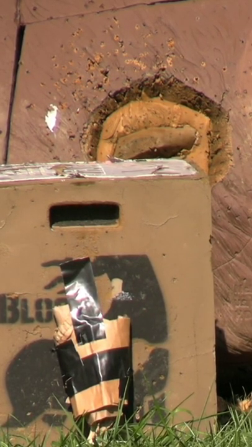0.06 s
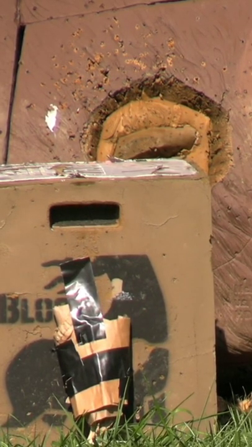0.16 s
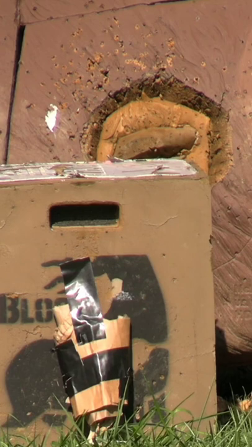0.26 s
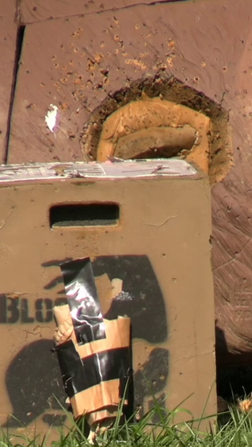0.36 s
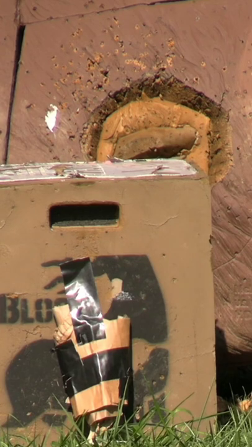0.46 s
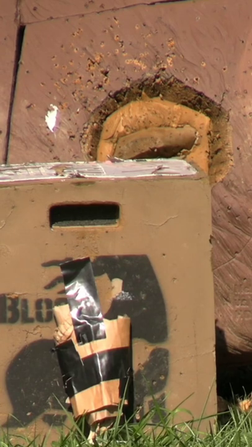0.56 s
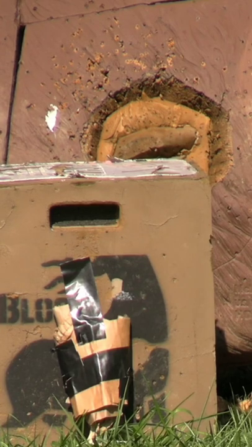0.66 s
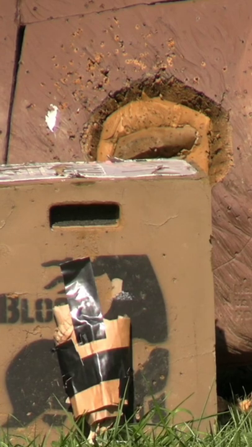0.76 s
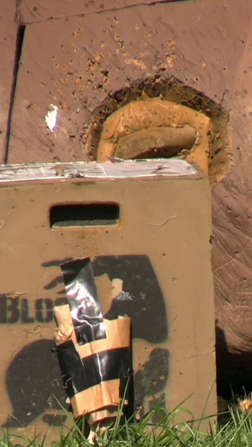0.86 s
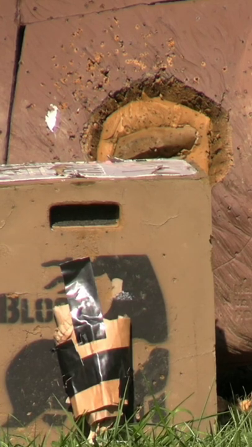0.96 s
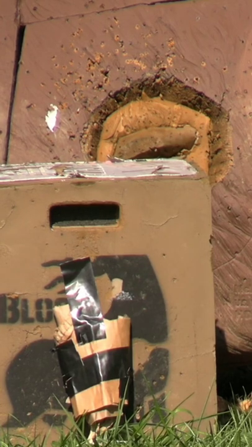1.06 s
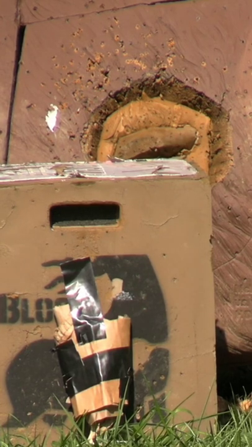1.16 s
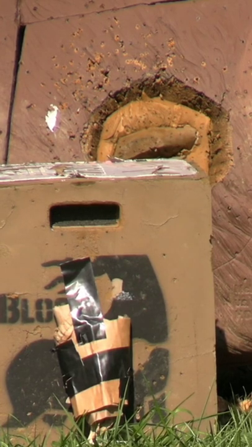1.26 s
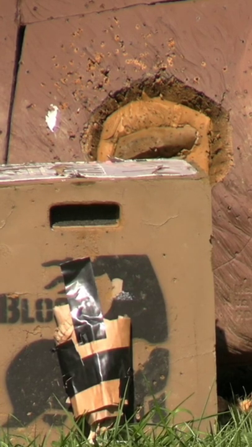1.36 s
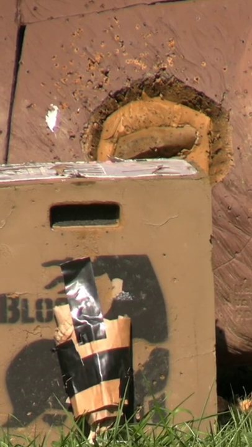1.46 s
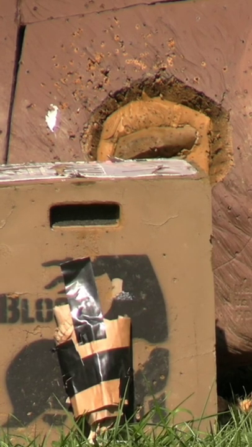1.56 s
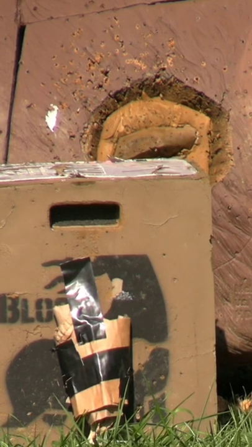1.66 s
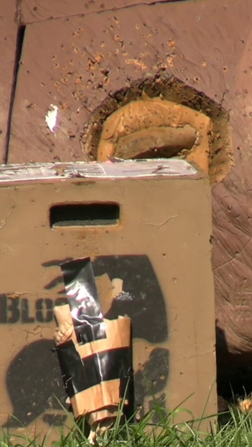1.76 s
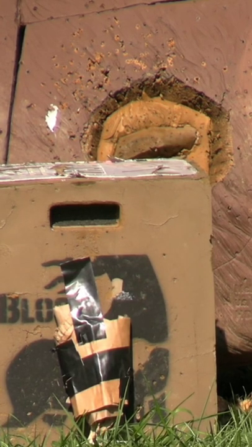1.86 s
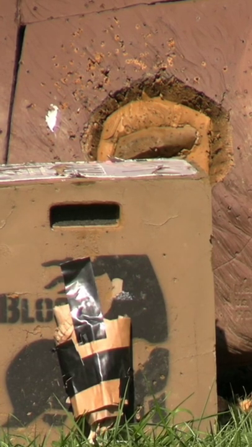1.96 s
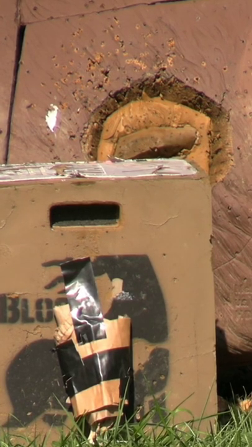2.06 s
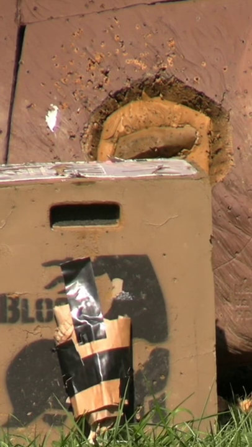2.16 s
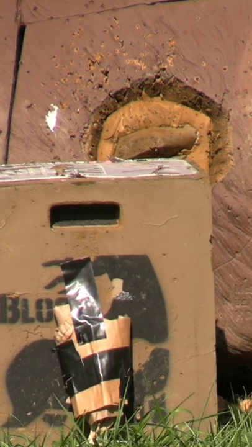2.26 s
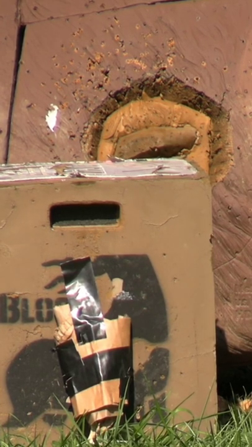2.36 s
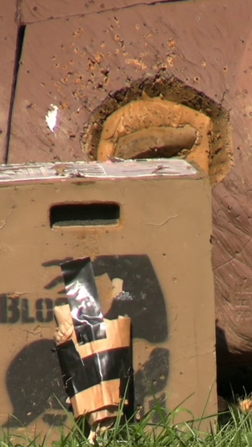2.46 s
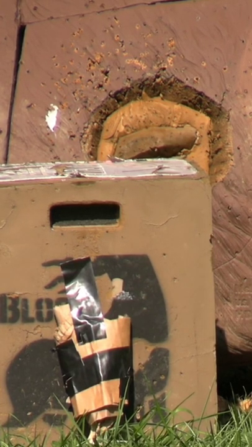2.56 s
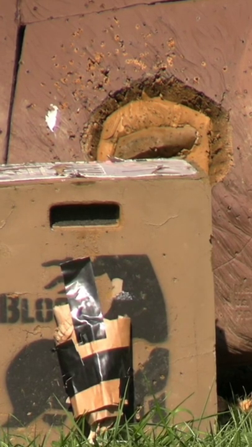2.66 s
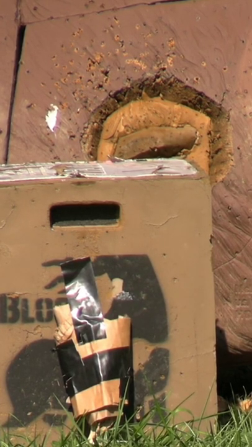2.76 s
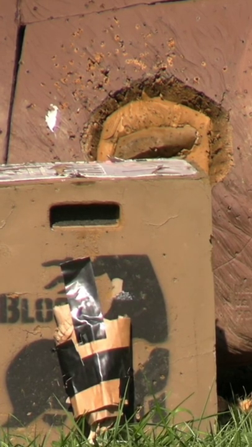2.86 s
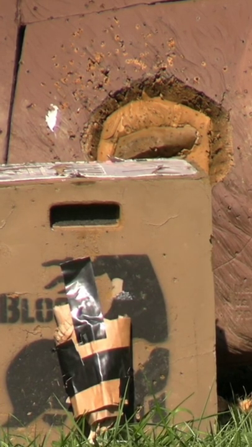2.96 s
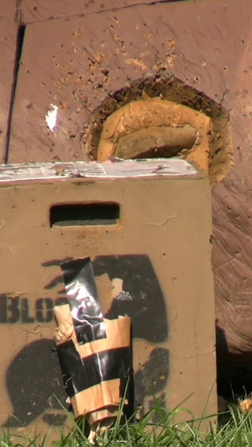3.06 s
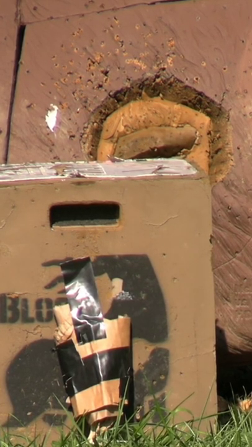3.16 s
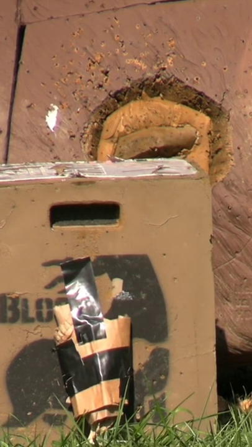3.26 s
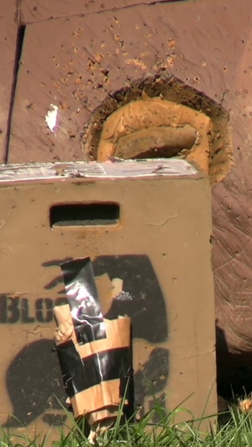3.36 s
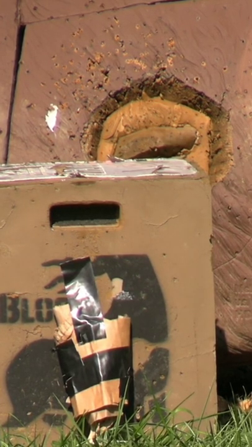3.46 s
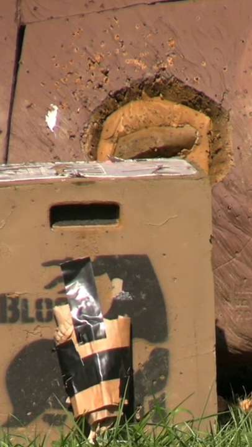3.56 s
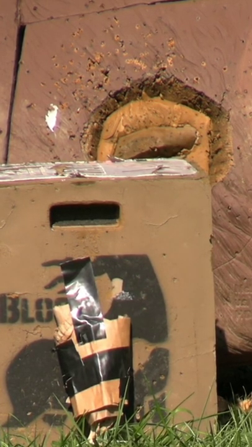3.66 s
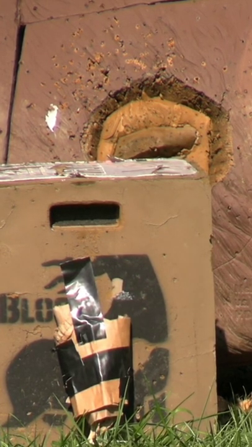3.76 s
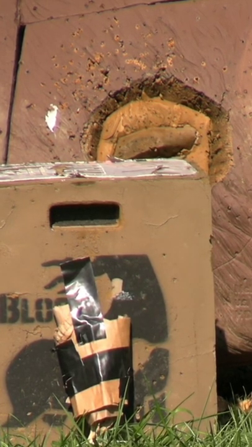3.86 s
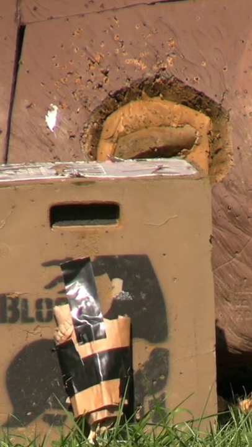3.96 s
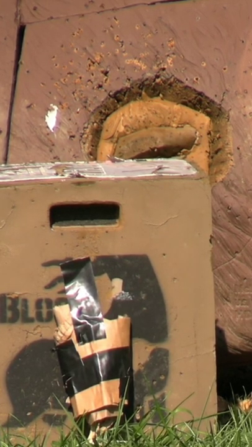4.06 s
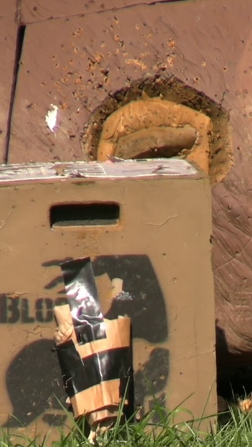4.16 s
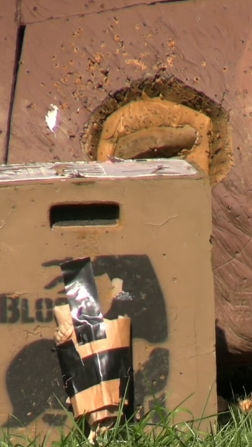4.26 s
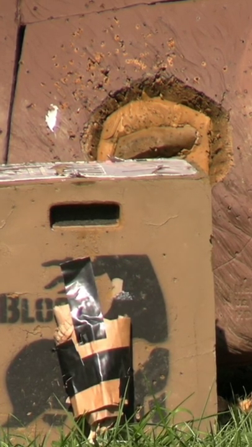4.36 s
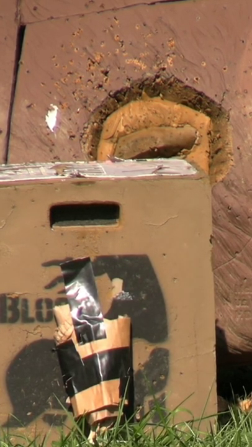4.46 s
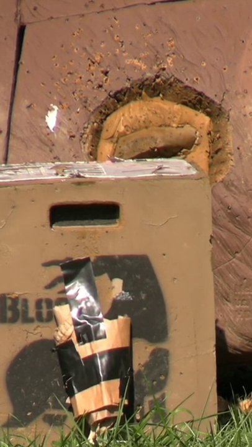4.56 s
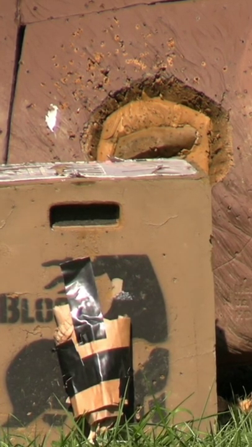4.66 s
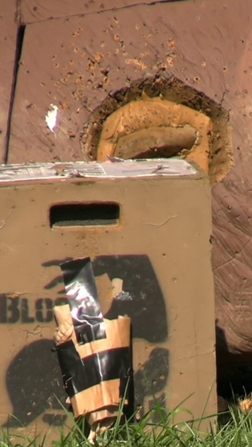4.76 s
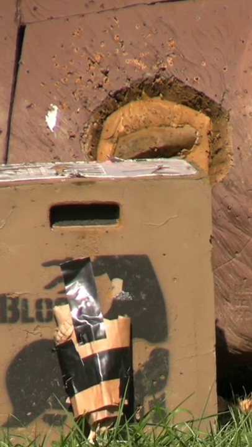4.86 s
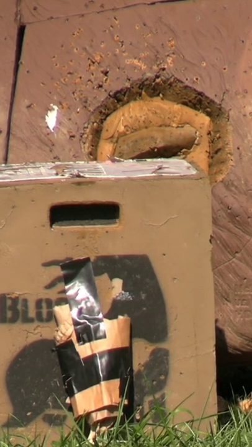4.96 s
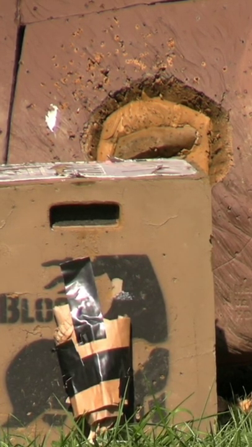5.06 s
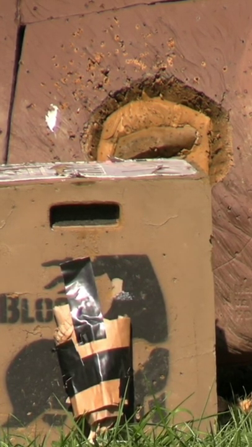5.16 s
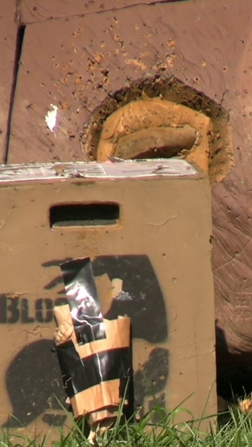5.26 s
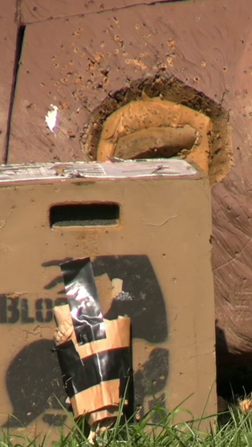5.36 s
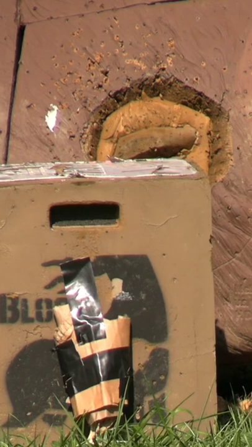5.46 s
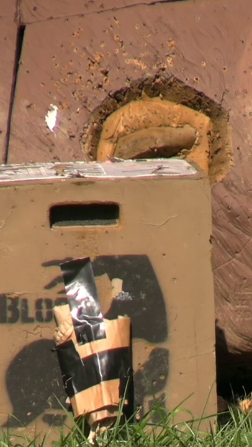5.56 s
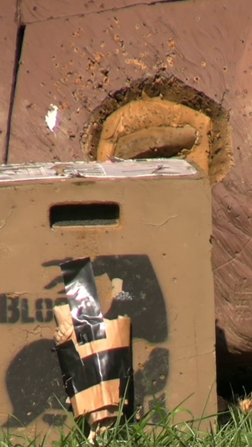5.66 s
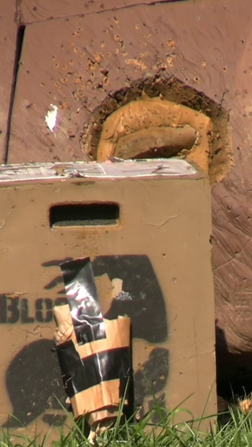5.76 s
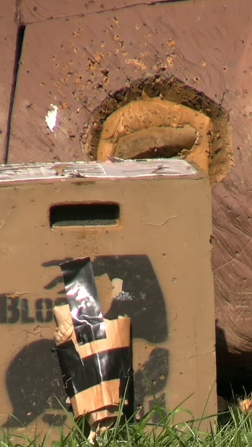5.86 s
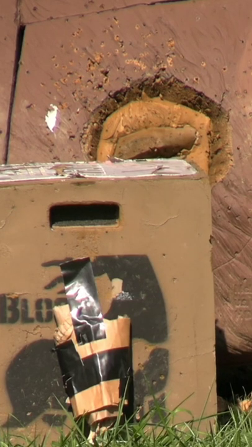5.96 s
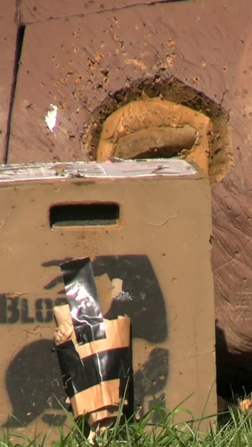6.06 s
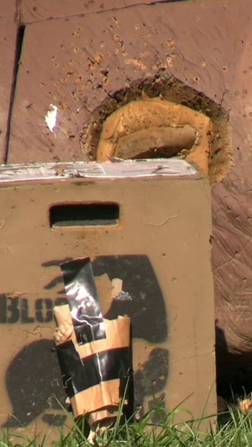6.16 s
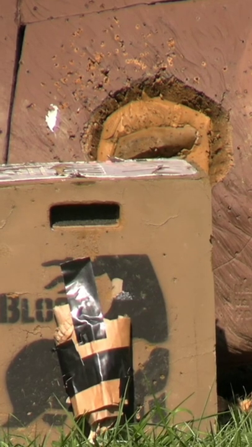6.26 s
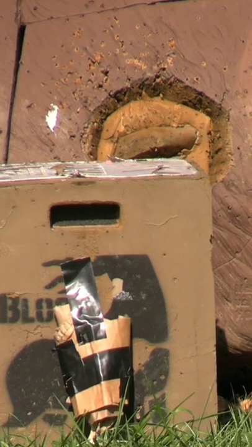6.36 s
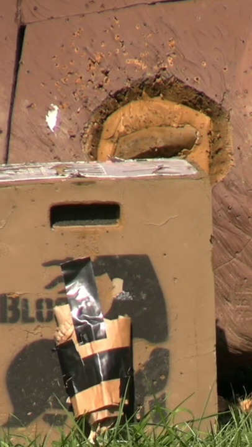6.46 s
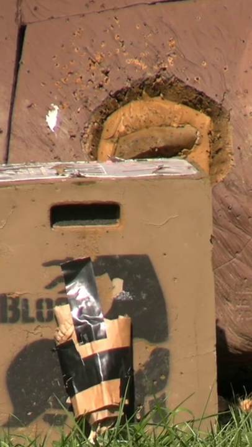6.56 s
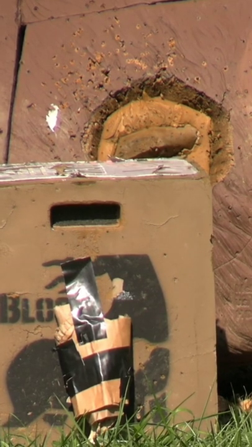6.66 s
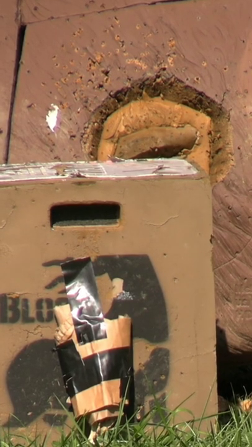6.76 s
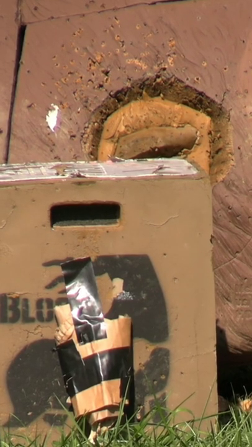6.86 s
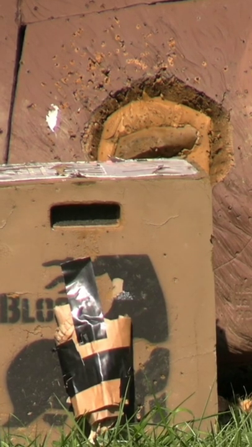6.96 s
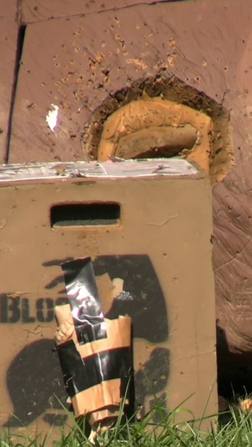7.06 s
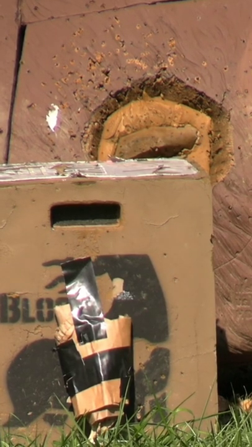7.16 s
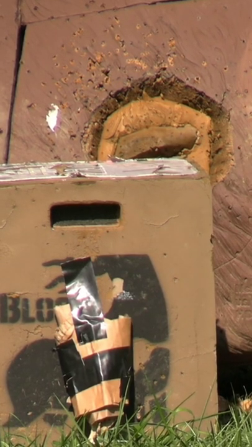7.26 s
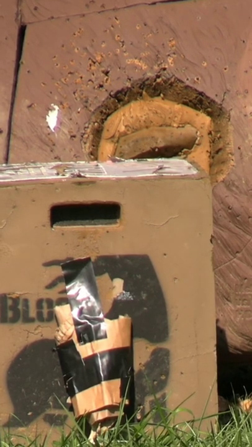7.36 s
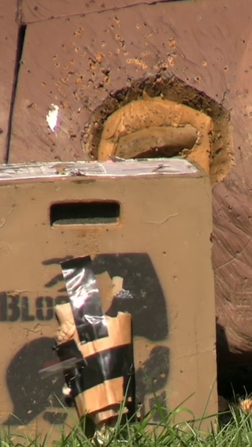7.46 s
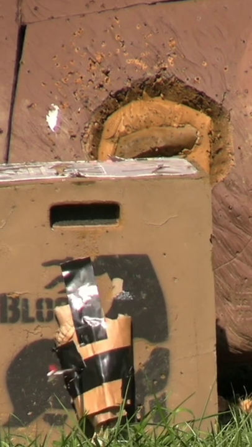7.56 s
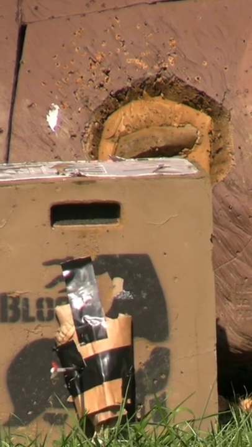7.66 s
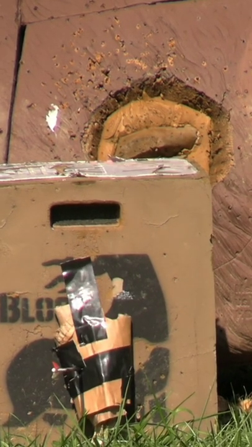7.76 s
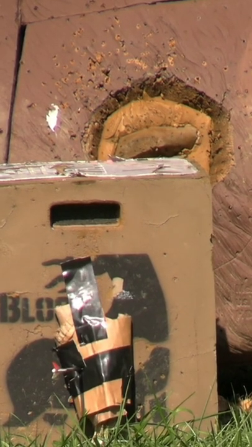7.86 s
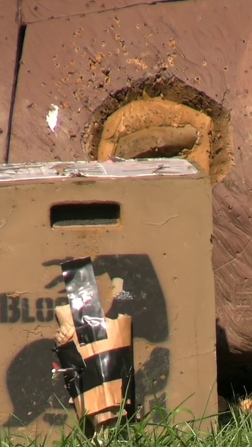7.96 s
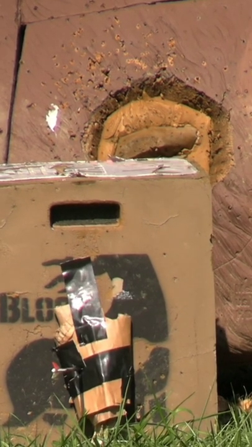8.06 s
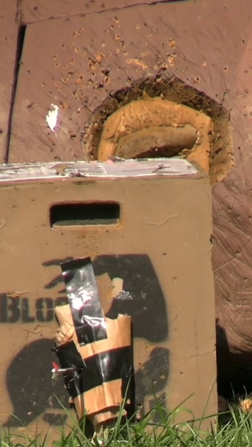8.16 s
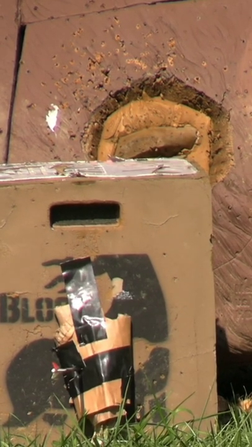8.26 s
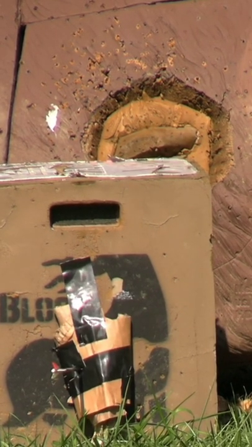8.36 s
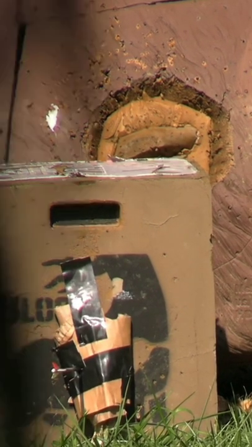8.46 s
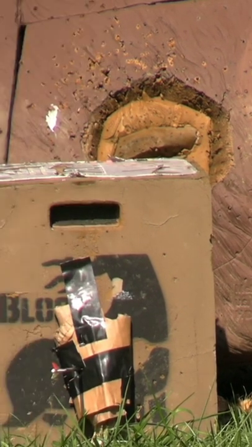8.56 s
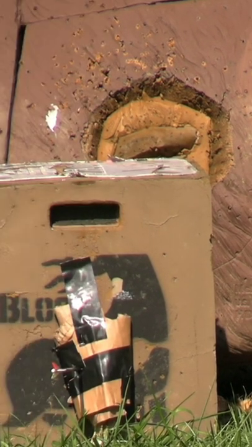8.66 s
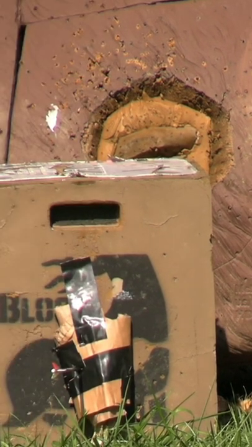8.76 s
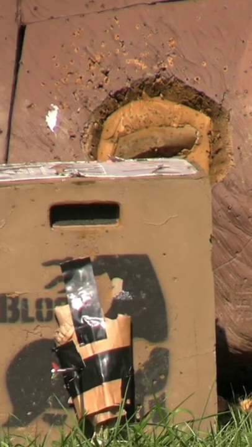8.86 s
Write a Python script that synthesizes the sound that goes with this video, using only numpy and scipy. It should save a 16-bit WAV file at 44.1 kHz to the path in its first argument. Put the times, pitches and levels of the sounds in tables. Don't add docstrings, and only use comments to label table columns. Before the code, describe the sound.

A sunny yard drones with insects and crickets over faint machine hum and distant traffic. A wren repeats quick phrases, small birds chip, a far crow caws. Late on, an arrow rips tape, shatters bone and thuds into a foam block with a sharp overloaded crack; a splinter ticks, then a hollow slap echoes off trees. Insects continue. One microphone, left channel only.

```python
import sys
import numpy as np
from scipy import signal
from scipy.fft import rfft, irfft, next_fast_len
from scipy.io import wavfile
from scipy.ndimage import uniform_filter1d

SR = 44100
rng = np.random.default_rng(int(sys.argv[2]) if len(sys.argv) > 2 else 0)


def to_wav(s):
    ch = np.atleast_2d(s).T
    pcm = np.round(np.clip(ch, -1, 1) * 32767)
    wavfile.write(sys.argv[1], SR, pcm.astype(np.int16))


def convert_level_to_amplitude(level_db):
    exponent = np.asarray(level_db, float) / 20
    return 10 ** exponent


N = 392490
T = np.arange(N) / SR


def rms_one(x):
    return x / np.sqrt(np.mean(x ** 2) + 1e-20)


def in_time(rows):
    s, *columns = np.transpose(rows)
    return [np.interp(T, s, c) for c in columns]


def at_hz(points, hz):
    table_hz, value = np.transpose(points)
    return np.interp(np.log(hz), np.log(table_hz), value)


def drift(rate_hz):
    r = np.exp(-80 * np.pi * rate_hz / SR)
    slow = signal.lfilter([1], [1, -2 * r, r * r], rng.standard_normal(N // 40 + 2002))[2000:]
    return np.interp(np.arange(N) / 40, np.arange(len(slow)), rms_one(slow))


def coloured(x, spectrum):
    hz = np.maximum(np.fft.rfftfreq(len(x), 1 / SR), 1)
    return rms_one(irfft(rfft(x) * convert_level_to_amplitude(at_hz(spectrum, hz)), len(x)))


def in_bands(x, low_hz, high_hz, count):
    size = next_fast_len(len(x))
    log_hz = np.log(np.fft.rfftfreq(size, 1 / SR) + 1)
    place = np.interp(log_hz, np.log([low_hz, high_hz]), [0, count - 1])
    whole = rfft(x, size)
    for k, hz in enumerate(np.geomspace(low_hz, high_hz, count)):
        weight = np.clip(1 - abs(place - k), 0, 1)
        yield hz, irfft(whole * weight, size)[:len(x)]


def patchy(spectrum, patchy_db, rate_hz, count):
    noise = coloured(rng.standard_normal(N), spectrum)
    bands = in_bands(noise, spectrum[1][0], spectrum[-2][0], count)
    return rms_one(sum(convert_level_to_amplitude(patchy_db * drift(rate_hz)) * band for _, band in bands))


def resonance(x, hz, width_hz):
    r = np.exp(-np.pi * width_hz / SR)
    poles = [1, -2 * r * np.cos(2 * np.pi * hz / SR), r * r]
    return signal.lfilter([(1 - r * r) / 2, 0, (r * r - 1) / 2], poles, x)


def resonance_twice(x, hz, width_hz):
    return resonance(resonance(x, hz, width_hz), hz, width_hz)


def ring(push, modes):
    out = 0
    for hz, level_db, t60_s in modes:
        r, w = convert_level_to_amplitude(-60 / (t60_s * SR)), 2 * np.pi * hz / SR
        poles = [1, -2 * r * np.cos(w), r * r]
        out = out + signal.lfilter([0, convert_level_to_amplitude(level_db) * np.sin(w)], poles, push + 1e-18)
    return out


def swell(length_s, rise_s, t60_s):
    t = np.arange(round(length_s * SR)) / SR
    return (1 - np.exp(-t / rise_s)) * convert_level_to_amplitude(-60 * t / t60_s) * (1 - t / length_s)


def add(out, s, x):
    i = round(s * SR)
    out[i:i + len(x)] += x[:N - i]


def sine(hz):
    return np.sin(2 * np.pi * np.cumsum(hz) / SR)


def note(length_s, start_hz, end_hz):
    hz = np.linspace(start_hz, end_hz, round(length_s * SR))
    return np.hanning(len(hz)) * sine(hz)


# t/s, level/dB
HUM = [(0.0, -52.5), (0.47, -50), (1.46, -52), (2.03, -51.5), (2.85, -55.5), (4.93, -59), (5.23, -58),
       (7.88, -54), (8.11, -52.5), (8.9, -54.5)]


def hum():
    level_db = in_time(HUM)[0] + 0.74 * drift(1.1) + drift(26)
    return np.sqrt(2) * convert_level_to_amplitude(level_db) * sine(100 + 0.94 * drift(3.5))


# f/Hz, level/dB per Hz
RUMBLE = [(15, -51.5), (25, -4.5), (70, -4.5), (86, -3), (103, -2), (115, -5), (129, -5.5), (200, -20),
          (234, -17.5), (300, -42), (390, -40.5), (660, -120)]


def rumble():
    return convert_level_to_amplitude(-56.5) * patchy(RUMBLE, patchy_db=-1.5, rate_hz=2.2, count=4)


# t/s, level/dB
BREEZE = [(0, -65), (.3, -74), (1.5, -74), (1.85, -64), (2.2, -74.5), (5, -73.5), (8.4, -79), (8.6, -61.5),
          (8.9, -62)]


def breeze():
    return in_time(BREEZE)[0]


# f/Hz, level/dB per Hz
TRAFFIC = [(150, -5.5), (250, -6), (300, -1), (490, -2.5), (600, -4), (1000, -9), (1510, -9), (1880, -13.5),
           (2300, -16), (2850, -18), (3200, -6.5), (3800, -14.5), (4400, -40.5), (5700, -41)]


def traffic():
    gust_db = np.maximum(breeze() + 76.5, 0)
    level_db = -64.5 + 0.091 * gust_db
    return convert_level_to_amplitude(level_db) * patchy(TRAFFIC, patchy_db=1.0, rate_hz=7.8, count=7)


# f/Hz, level/dB per Hz
HISS = [(5590, -30), (9500, -1.5), (10400, -2.5), (12500, 4.5), (15100, 1), (16000, -2), (16300, -15)]


def hiss():
    return convert_level_to_amplitude(-79) * coloured(rng.standard_normal(N), HISS)


# f/Hz, level/dB per Hz
LEAVES = [(300, -35.5), (600, -0.5), (1500, -1.5), (2500, -13), (5000, -13.5), (12000, -27), (16000, -25),
          (17000, -62.5)]


def leaves():
    return convert_level_to_amplitude(breeze()) * coloured(rng.standard_normal(N), LEAVES)


# f/Hz, level/dB per Hz
CHORUS = [(2470, -63), (4200, -24), (5250, -14.5), (5540, -4.5), (5800, 0.5), (6530, 1.5), (6910, 0.5),
          (7520, -0.5), (7940, -3), (8900, -20), (9080, -25), (9400, -35), (10500, -42.5), (13600, -68),
          (22000, -120)]


def chorus():
    return convert_level_to_amplitude(-51.5) * patchy(CHORUS, patchy_db=0.9, rate_hz=35, count=10)


# f/Hz, width/Hz, level/dB, pulse rate/Hz, pulse depth/0-1
SINGERS = [(6420, 94, -60.5, 100, 0.3), (7180, 190, -66, 68, 0.7), (7470, 58, -65, 56, 1),
           (6000, 32, -67, 95, 0.44), (8280, 47, -70, 40, 0.3), (3145, 50, -83, 71, 0.1),
           (1597, 17.4, -79.5, 30, 0.02), (2600, 40, -88, 40, 0.44)]


def singers():
    out = 0
    for hz, width_hz, level_db, pulse_hz, depth in SINGERS:
        throb = 1 + depth * sine(pulse_hz * (1 + 0.032 * drift(0.98)))
        voice = rms_one(resonance_twice(rng.standard_normal(N), hz, width_hz))
        out = out + convert_level_to_amplitude(level_db + 1.1 * drift(0.43)) * throb * voice
    return out


def cricket(ahead, stroke_hz, hz, fall_hz, duty, blur):
    stroke = (stroke_hz * T + in_time(ahead)[0] + 0.5) % 1 - 0.5
    shape = np.cos(np.pi * np.clip(stroke / duty, -0.5, 0.5)) ** 2
    pitch_hz = hz - fall_hz * stroke / duty + 8 * drift(29)
    tone = shape * convert_level_to_amplitude(1.02 * drift(32)) * sine(pitch_hz)
    smear = resonance_twice(rng.standard_normal(N), hz - 30, 151)
    return rms_one(rms_one(tone) + blur * rms_one(smear))


# t/s, lead on steady beat/strokes
LOW_AHEAD = [(0, .13), (2.75, .04), (3.25, -.1), (4.25, -.13), (6, .13), (7.2, .33), (7.6, .8), (8.9, 1.12)]


def low_cricket():
    return convert_level_to_amplitude(-68.5) * cricket(LOW_AHEAD, 45, hz=3470, fall_hz=220, duty=0.85, blur=0.3)


# t/s, lead on steady beat/strokes
HIGH_AHEAD = [(0, -.4), (2.75, -.6), (3.75, -.92), (5.25, -.97), (7.2, -.85), (7.6, -.6), (8.9, -.71)]
# t/s, level/dB
HIGH_CRICKET = [(1.5, -92), (2.5, -75), (5, -68), (8, -66.5), (8.9, -72)]


def high_cricket():
    strokes = cricket(HIGH_AHEAD, 19.7, hz=8594, fall_hz=60.15, duty=0.3, blur=0.47)
    return convert_level_to_amplitude(in_time(HIGH_CRICKET)[0]) * strokes


def trill():
    out = np.zeros(N)
    for k in range(15):
        add(out, k / 58 + 0.004, convert_level_to_amplitude(-59.5 - 0.5 * k) * note(0.014, 5400, 4400))
    return out * convert_level_to_amplitude(1.5 * drift(30))


def bump():
    out = np.zeros(N)
    add(out, 1.105, convert_level_to_amplitude(-45.5) * ring(swell(0.1, 0.001, 0.01), [(182, -20, 0.066)]))
    return out


# t after start/s, length/s, start f/Hz, end f/Hz, level/dB
WREN = [
    (-.006, 0.0223, 3775, 2590, -5),
    (0, 0.026, 2600, 2030, -7.5),
    (0.026, 0.041, 2440, 2240, -8),
    (0.053, .046, 2850, 2500, -6.5),
    (0.144, 0.0318, 2152, 2670, -2),
]
# t/s, level/dB
PHRASES = [(1.345, -53), (1.578, -53.5), (1.82, -53), (2.057, -50.5), (2.284, -49.5), (2.525, -50)]


def wren():
    out = np.zeros(N)
    for s, phrase_db in PHRASES:
        for after_s, length_s, start_hz, end_hz, note_db in WREN:
            level_db = phrase_db + note_db + rng.normal(0, 0.75)
            add(out, s + after_s, convert_level_to_amplitude(level_db) * note(length_s, start_hz, end_hz))
    return out


# t/s, peak level/dB, centre f/Hz, width/Hz, t60/s
TICKS = [
    (1.35, -50, 2500, 2500, .03),
    (2.121, -52, 10000, 6000, 0.012),
    (3.035, -59, 6000, 7900, .08),
    (5.217, -53.5, 2950, 500, 0.054),
    (5.217, -65, 4000, 5000, .05),
    (7.385, -37.5, 1210, 300, 0.082),
    (7.39, -38, 4300, 500, 0.0307),
]


def ticks():
    out = np.zeros(N)
    for s, peak_db, hz, width_hz, t60_s in TICKS:
        snap = rms_one(resonance(rng.standard_normal(SR // 10), hz, width_hz))
        add(out, s, convert_level_to_amplitude(peak_db) * snap * swell(0.1, 0.001, t60_s))
    return out


# t/s, level/dB
CHIPS = [(1.685, -58), (1.815, -59), (3.225, -53), (3.36, -54), (5.054, -64), (6.49, -55), (6.609, -52),
         (6.729, -53), (6.845, -53), (6.965, -59)]


def chips():
    out = np.zeros(N)
    for s, chip_db in CHIPS:
        add(out, s, convert_level_to_amplitude(chip_db - 10) * note(0.04, 4500, 3400))
    return out


def through_leaves(calls):
    blur = convert_level_to_amplitude(-31) * swell(0.5, 0.001, 0.07)
    echo = convert_level_to_amplitude(-41) * swell(0.5, 0.01, 1.2)
    response = rng.standard_normal(SR // 2) * (blur + echo)
    return calls * convert_level_to_amplitude(2.5 * drift(150) - 1.5) + signal.fftconvolve(calls, response)[:N]


# f/Hz, width/Hz, level/dB
CROW_THROAT = [(1300, 270, 4), (1694, 93, -2)]
# t/s, length/s, level/dB
CAWS = [
    (3.863, 0.44, -66),
    (4.34, 0.44, -64),
    (4.932, 0.47, -62.5),
    (5.45, .42, -61.5),
    (6.023, 0.2, -70),
]


def crow():
    cycles = np.cumsum(330 * (1 + 0.044 * drift(60) + 0.063 * drift(3))) / SR
    pulses = np.diff(np.floor(cycles), prepend=0) * convert_level_to_amplitude(2.6 * rng.standard_normal(N))
    source = rms_one(pulses) + 0.96 * rng.standard_normal(N)
    voice = sum(convert_level_to_amplitude(db) * resonance_twice(source, hz, width_hz) for hz, width_hz, db in CROW_THROAT)
    effort = np.zeros(N)
    for s, length_s, caw_db in CAWS:
        part = np.linspace(0, 1, round(length_s * SR))
        shape_db = np.interp(part, [0, 0.25, 0.6, 1], [-7, 0, 0, -7])
        add(effort, s, convert_level_to_amplitude(caw_db + shape_db))
    return uniform_filter1d(effort, size=1500) * convert_level_to_amplitude(2 * drift(17)) * rms_one(voice)


# t/s, length/s, start f/Hz, level/dB
WHISTLES = [
    (5.437, .17, 2680, -62),
    (5.59, .15, 2680, -67),
    (5.725, .12, 2600, -68),
]


def whistles():
    out = np.zeros(N)
    for s, length_s, start_hz, level_db in WHISTLES:
        part = np.linspace(0, 1, round(length_s * SR), endpoint=False)
        tone = sine(start_hz - 140 * part ** 2)
        add(out, s, convert_level_to_amplitude(level_db) * swell(length_s, 0.013, 3.8) * tone)
    return out * convert_level_to_amplitude(1.5 * drift(30))


# f/Hz, level/dB per Hz
FRACTURE = [(700, -3), (1200, -1.5), (2400, -1.5), (4200, -3), (7000, -3.5), (9000, -9), (11000, -10.5),
            (13500, -4.5), (15500, -9.5), (16300, -23.5), (17500, -63)]


def fracture(level_db, rise_s, t60_s):
    uneven_db = 3 * np.minimum(rng.exponential(1, SR // 10), 4)
    grains = rng.standard_normal(SR // 10) * convert_level_to_amplitude(uneven_db)
    return convert_level_to_amplitude(level_db) * coloured(grains, FRACTURE) * swell(0.1, rise_s, t60_s)


# f/Hz, t60/s
ECHO_T60 = [(150, 0.43), (500, 0.71), (1400, 1.04), (3500, 0.97), (8000, 1.1), (15000, 0.51)]


def scatter(spectrum, rise_s, shorten):
    noise = coloured(rng.standard_normal(SR) * convert_level_to_amplitude(1.5 * drift(149.5)[:SR]), spectrum)
    bands = in_bands(noise, 150, 15200, count=12)
    return sum(band * swell(1, rise_s, shorten * at_hz(ECHO_T60, hz)) for hz, band in bands)


# t/s, level/dB, rise/s, t60/s
RIPS = [
    (7.251, -20, .001, .022),
    (7.2545, -26, .0006, .025),
    (7.261, -40, .001, .06),
    (7.272, -27, .005, .05),
]
# t/s, level/dB, rise/s, t60/s, push on block/dB
CONTACTS = [
    (7.2771, -11.5, 0.00017, 0.024, -2.5),
    (7.279, -15.5, .0007, 0.022, -13.5),
    (7.2813, -8.5, 0.00032, 0.029, -4.5),
    (7.2835, -21.5, 0.00041, 0.057, -4),
    (7.302, -28.5, 0.0013, 0.045, -4.5),
    (7.315, -32, 0.0024, 0.035, -2),
    (7.33, -43, .001, .03, -10),
    (7.359, -49, .002, 0.035, 1),
]
# f/Hz, level/dB, t60/s
BLOCK = [(196, -11, .08), (263, -8, .1), (300, -8.5, 0.091), (339, -8, 0.23), (599, 1.5, .07),
         (687, 0, .04), (916, -11, 0.035), (1225, -9.5, 0.11), (1330, -13.5, .05), (2450, -5, .06),
         (2980, -14.5, .04), (4100, -15.5, .02)]
# f/Hz, level/dB per Hz
HIT_TAIL = [(71, -63.5), (120, -18.5), (314, -3.5), (493, -14), (670, -7.5), (856, -23), (1290, -19),
            (1790, -26), (2380, -23), (6500, -31.5), (16000, -39.5)]


def arrow():
    push, out = np.zeros(N), np.zeros(N)
    for s, level_db, rise_s, t60_s in RIPS:
        add(out, s, signal.lfilter([1, -0.8], [1, -0.4], fracture(level_db, rise_s, t60_s)))
    for s, level_db, rise_s, t60_s, push_db in CONTACTS:
        add(out, s, fracture(level_db, rise_s, t60_s))
        add(push, s, convert_level_to_amplitude(level_db + push_db - 5.5) * swell(0.1, 0.00016, 0.0014))
    add(out, 7.28, convert_level_to_amplitude(-29) * scatter(HIT_TAIL, rise_s=0.0034, shorten=0.63))
    quiver = swell(0.16, 0.04, 0.8)
    shaft = np.sin(2 * np.pi * 665 * np.arange(len(quiver)) / SR)
    add(out, 7.31, convert_level_to_amplitude(-31) * quiver * shaft)
    thud = ring(np.diff(push, prepend=0) + 0.23 * push, BLOCK)
    return out - signal.lfilter(*signal.butter(2, 110, "high", fs=SR), thud)


# f/Hz, level/dB, t60/s
SLAP = [(194.5, -17.5, 0.056), (300, -17.5, 0.031), (500, -22.5, 0.0097), (718, 4, 0.0073),
        (913, -8.5, 0.0097), (1307, -23, 0.014)]
# f/Hz, level/dB per Hz
ECHO = [(120, -46), (200, -0.5), (249, -20), (322, -4.5), (353, -27.5), (519, -2), (1400, -3.5),
        (1980, -11), (5420, -17.5), (8900, -30), (16000, -41)]
# delay/s, level/dB
RETURNS = [(.014, -30), (.039, -39.5), (.043, -36), (.047, -35), (0.052, -25), (.07, -40), (.098, -39),
           (.128, -46)]


def slap():
    slap_s, level_db = 7.5422, -5.5
    out, click = np.zeros(N), np.zeros(SR // 8)
    click[0] = convert_level_to_amplitude(level_db)
    click[round(0.00044 * SR)] = -convert_level_to_amplitude(level_db + 2)
    crack = coloured(rng.standard_normal(len(click)), ECHO)
    crack *= convert_level_to_amplitude(-16) * swell(len(click) / SR, 0.001, 0.039)
    direct = ring(click, SLAP) + crack
    add(direct, 0, resonance(fracture(-4, 0.0001, 0.005), 7500, 12000))
    add(out, slap_s, direct)
    for delay_s, return_db in RETURNS:
        add(out, slap_s + delay_s, convert_level_to_amplitude(return_db) * resonance(direct, 1310, 2500))
    add(out, slap_s, convert_level_to_amplitude(-26) * scatter(ECHO, rise_s=0.016, shorten=0.47))
    add(out, slap_s, convert_level_to_amplitude(-43.5) * scatter(ECHO, rise_s=0.083, shorten=2.6))
    return out


def scene():
    floor = hum() + rumble() + traffic() + hiss() + leaves()
    insects = chorus() + singers() + low_cricket() + high_cricket()
    birds = trill() + through_leaves(wren() + chips()) + crow() + whistles()
    mono = floor + insects + birds + bump() + ticks() + arrow() + slap()
    return np.array([2 * mono, 0 * mono])


def low_pass(x):
    return signal.sosfilt(signal.butter(12, 15750, fs=SR, output="sos"), x)


def record(dry):
    dry = signal.sosfilt(signal.butter(2, 55, "high", fs=SR, output="sos"), dry)
    over_db = np.maximum(20 * np.log10(np.abs(dry[0]) + 1e-9) + 3, 0)
    fall_db = 40 * T
    held_db = np.maximum.accumulate(over_db + fall_db) - fall_db
    duck_db = signal.lfilter([0.004], [1, -0.996], held_db)
    return low_pass(np.clip(dry * convert_level_to_amplitude(-0.4 * duck_db), -1, 1))


dry = scene()
out = record(dry)
to_wav(out)
```